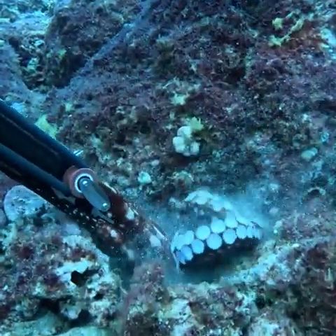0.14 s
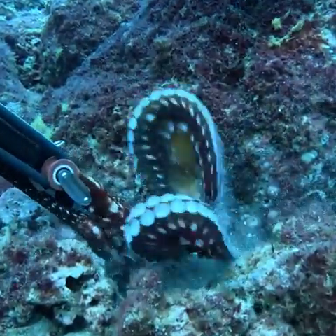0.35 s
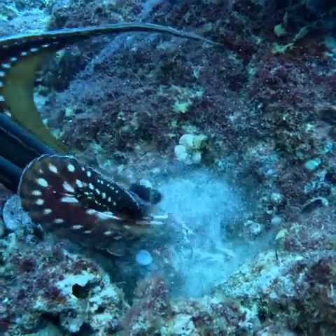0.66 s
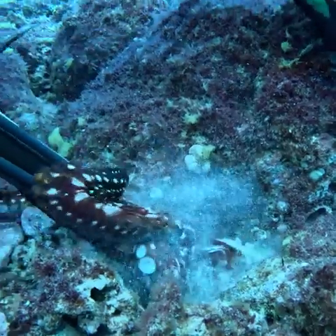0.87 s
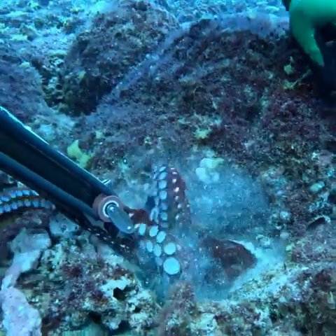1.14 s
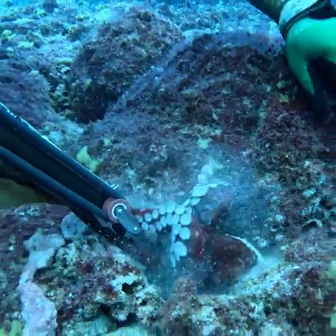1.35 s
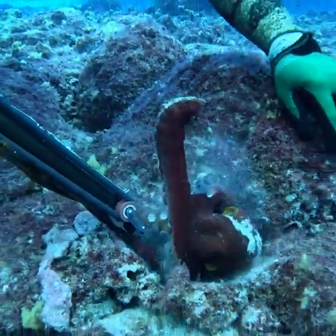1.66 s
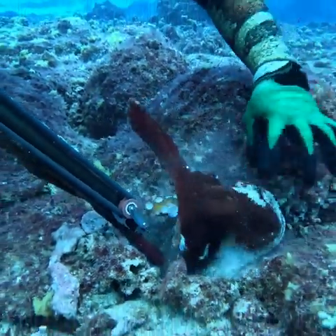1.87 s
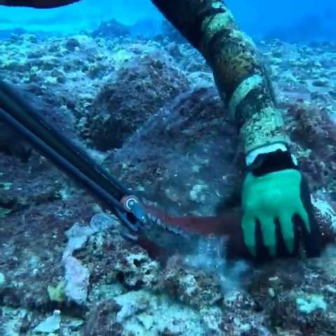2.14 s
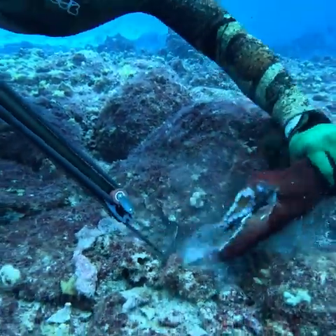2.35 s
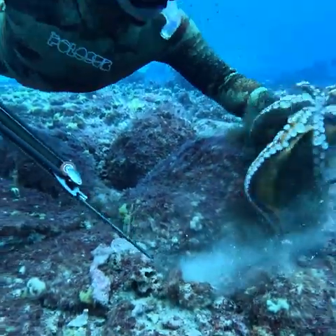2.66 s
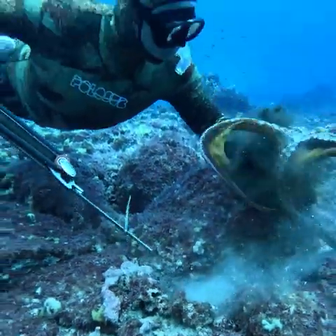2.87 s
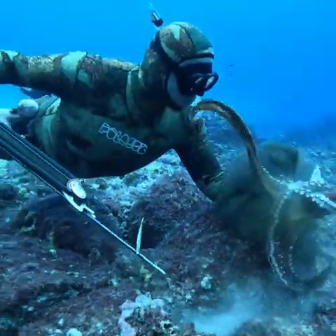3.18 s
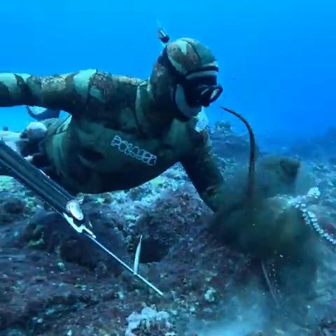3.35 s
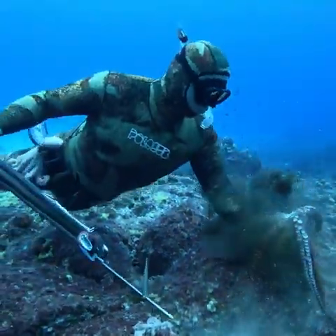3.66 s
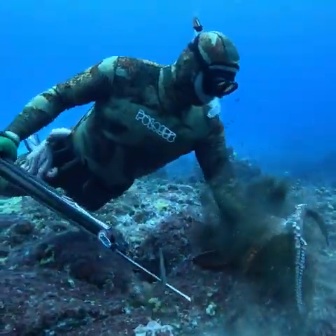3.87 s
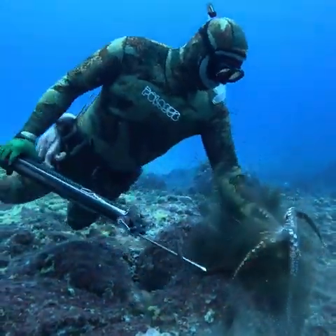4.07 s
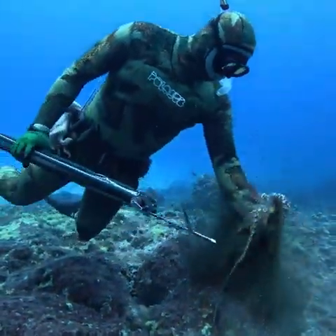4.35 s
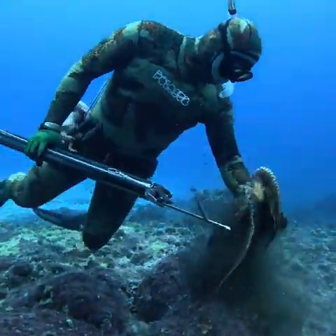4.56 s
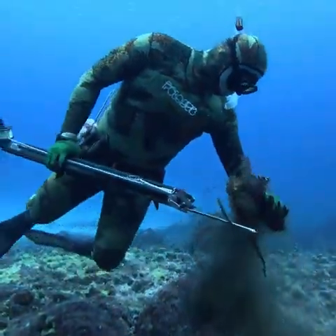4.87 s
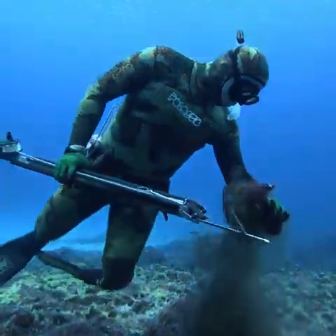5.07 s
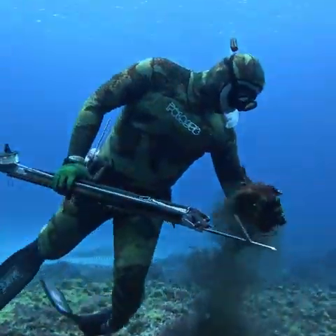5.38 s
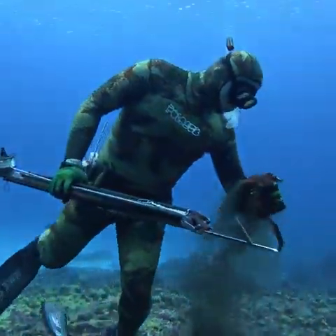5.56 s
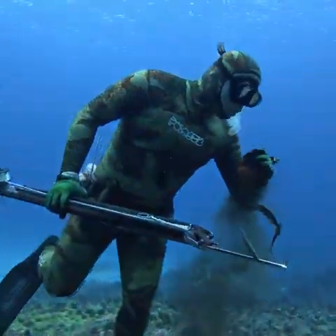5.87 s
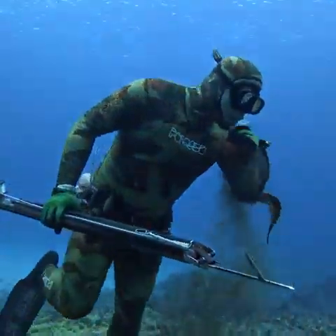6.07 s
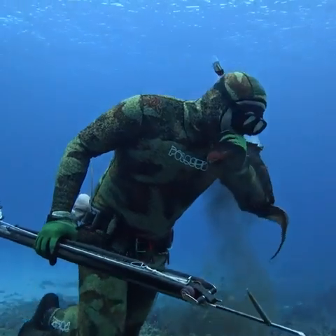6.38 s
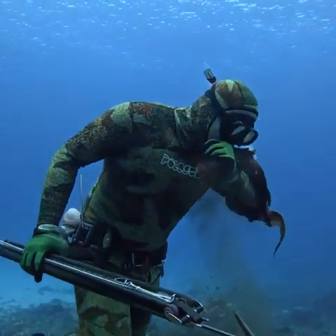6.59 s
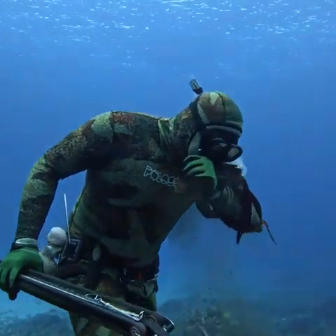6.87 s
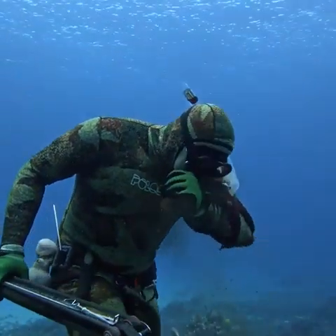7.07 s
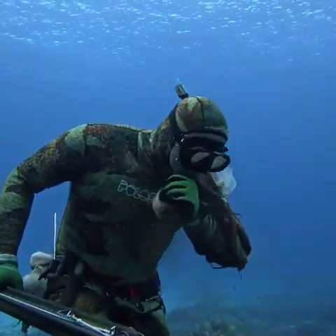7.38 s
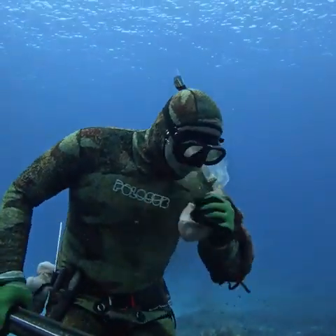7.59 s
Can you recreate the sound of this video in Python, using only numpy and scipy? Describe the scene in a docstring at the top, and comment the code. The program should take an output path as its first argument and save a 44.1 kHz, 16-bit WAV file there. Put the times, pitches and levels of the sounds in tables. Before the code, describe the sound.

Underwater on a reef, heard closely through a small plastic camera housing. A strong dull knock opens at 0 s, with several more clustered at 0.15-0.25 s, gritty scuffs and rubbing over fine crackling shrimp. Around 0.7-0.9 s short pops and scrapes come with a low push of water; one loud, hard knock lands near 1.36 s, followed by lighter rubbing. From 2.5 to 2.7 s a tight clatter of bright knocks and coarse scraping bursts out as the narrow mono image opens to stereo. Then a lull: thin crackle, sparse snaps and small pops, with faint hollow taps near 4.3 s. Crackle rises toward 5 s; sharp snaps and thumping bubble pops bunch at 5.3-6 s, some to the right. Low gurgling rumble swells after 6 s, with softer pops, small knocks and rubs from 6.85 s, and faint hollow taps around 7.5 s.

```python
"""On a reef, a small camera in a plastic housing sits beside a diver, and snapping shrimp crackle all round.
Clicks and noise through the housing resonances make the crackle; pushes on tuned wall modes make the knocks,
rubs and scuffs, and two decaying tones the small ticks and hollow taps. Low filtered noise and clicks make
the rumble and gurgle of the flow, falling chirps the pops at the microphone ports. Mono opens to stereo."""
import sys
import numpy as np
from scipy import signal
from scipy.io import wavfile
from scipy.ndimage import uniform_filter1d

SR = 44100
rng = np.random.default_rng(int(sys.argv[2]) if len(sys.argv) > 2 else 0)


def persist_wave(psi):
    """Save psi, clipped to +-1, as 16-bit WAV."""
    counts = np.round(np.clip(psi, -1, 1) * 32767).astype(np.int16)
    wavfile.write(sys.argv[1], SR, np.atleast_2d(counts).T)


N = 340893
T = np.arange(N) / SR

# crackle bed of the reef: [t/s, level/dB]
REEF_LEVEL = [(0.0, -52.5), (0.34, -55.5), (1.94, -54), (2.58, -58.5), (2.73, -59.5), (3.59, -54.5),
              (4.91, -49.5), (6.59, -48.5), (6.82, -45), (7.49, -47.5), (7.73, -44.5)]
# housing and port resonances for sound in the water, widths before broadening:
# [f/Hz, width/Hz, level in mono/dB, level in stereo/dB]
PORT_MODES = [(405, 370, -12, -12.5), (1576, 625, -3, -3), (2582, 122, -14.5, -2.5), (3028, 316, 2, 2),
              (3977, 640, 1.5, -6.5), (5025, 890, 1.5, -3), (5624, 1700, -1, -4.5), (7517, 534, 1, -1.5),
              (8570, 3000, -74, -18), (10660, 3800, -17.5, -31.5), (12200, 6900, -38, -35)]
MONO_COLUMN, STEREO_COLUMN = 2, 3
# resonances of the difference between the two ports, widths before broadening: [f/Hz, width/Hz, level/dB]
SIDE_MODES = [(1640, 670, -5), (2510, 170, -5), (2980, 530, -1.5), (4000, 350, 0), (5600, 160, -4),
              (9440, 650, -17), (11600, 930, -25)]
# opening of the stereo image: [t/s, share of the side signal (0 to 1)]
STEREO_OPENING = [(0, 0), (2.27, 0), (2.5, 1), (7.73, 0.88)]
# modes of the housing wall, before damping and hardness: [f/Hz, level/dB, t60/s]
WALL_MODES = [(278, -26.5, 0.016), (452, -27, 0.011), (605, -3, 0.028), (692, 3, 0.05),
              (737.4, -3.5, 0.089), (1090, -0.5, 0.028), (1138, 2.5, 0.06), (1267, -11.5, 0.031),
              (1740, -12, 0.0099), (1710, 0, 0.058), (2580, -24, 0.02), (2995, 0, 0.04),
              (5340, -0.5, 0.0068), (7800, -13, 0.0055)]
# knocks on the housing: [t/s, peak level/dB, hardness/(dB per octave)]
KNOCK_HITS = [(0.0, -12, -7.5), (0.151, -17.5, -0.5), (0.162, -17, -19), (0.195, -31, -14),
              (0.206, -13.5, -0.5), (0.214, -25.5, -13), (0.244, -33.5, -1), (0.583, -35, -4),
              (0.684, -30.5, -20), (1.063, -32.5, -2), (1.122, -44, 0), (1.257, -33, -12), (1.275, -38, -4),
              (1.293, -38, -3), (1.363, -10.5, -1), (1.446, -25.5, -16), (1.436, -36, -5), (1.481, -35, -9),
              (1.492, -37, -16), (1.86, -38, -5), (2.013, -35.5, -14), (2.112, -39, -5), (2.132, -37, -11),
              (2.235, -32.5, -18), (2.526, -32, 3), (2.543, -30, 3), (2.570, -18, 1), (2.593, -12, 1),
              (2.575, -24, 3), (2.599, -22, 9), (2.608, -29, 3), (2.629, -20.5, -8), (2.641, -20, 6),
              (2.647, -20, 6), (2.655, -22, -2), (2.664, -11, 1), (2.682, -32, 2.5), (2.697, -22, -5),
              (6.863, -32, -21), (6.887, -35, 5), (6.909, -36, -4), (6.931, -32, 6), (6.942, -32, -1),
              (6.95, -29.5, -0.5), (7.001, -35, -14), (7.025, -41, -10), (7.048, -44, -14),
              (7.066, -42.5, -13), (7.092, -46, -6), (7.103, -41.5, -14), (7.148, -35, -15), (7.2, -36, -4),
              (7.219, -47, -10), (7.473, -38, -9), (7.528, -28, -4), (7.63, -34, 4)]
# rubbing on the housing: [t/s, level/dB]
RUB_LEVEL = [(0.0, -48.5), (0.17, -53), (0.41, -62.5), (0.64, -69), (0.73, -48.5), (1.03, -58), (1.31, -55),
             (1.59, -56), (1.87, -65), (2.43, -58), (2.56, -54), (2.84, -69), (3.44, -64.5), (3.66, -65.5),
             (4.4, -63.5), (5.47, -65.5), (5.77, -55.5), (6.0, -62.5), (6.52, -59), (6.93, -56),
             (7.04, -60), (7.21, -63), (7.73, -57)]
# flow past the ports, before its random swells: [t/s, slow eddy level/dB, gurgle level/dB]
FLOW_LEVELS = [(0.0, -52, -54), (0.54, -51.5, -70), (0.77, -45, -61), (1.12, -57.5, -58.5),
               (1.46, -50, -50), (1.78, -45.5, -66), (2.5, -48.5, -57.5), (2.71, -59, -66.5),
               (3.25, -57.5, -64.5), (3.95, -56.5, -61), (4.25, -55, -59.5), (4.48, -50.5, -53),
               (5.02, -48, -59), (5.36, -43.5, -69), (5.75, -45, -49), (6.2, -38.5, -63.5),
               (6.55, -40.5, -57), (6.76, -46.5, -64), (7.19, -37.5, -50.5), (7.73, -42.5, -46)]
# single shrimp close by, and at some knocks the bright crack of the hit: [t/s, peak level/dB, brightness/(dB
# per octave)]
NEAR_SNAPS = [(0.033, -31, -10), (0.3677, -33.5, -11), (0.464, -38, -21), (0.615, -29.5, -6),
              (0.9, -34.5, -8), (0.941, -28.5, -14), (1.1, -33, 2), (1.2401, -22.5, -4),
              (1.343, -34.5, -12), (1.586, -34, 2), (1.7, -25, -13.5), (1.722, -27.5, -6), (1.836, -45, 2),
              (2.291, -29.5, 11), (2.354, -41, 2), (2.446, -40, 2), (2.5249, -29.5, -14), (2.541, -34, 7),
              (2.551, -28.5, -4), (2.556, -28.5, -10), (2.566, -39, 13), (2.6623, -24, 12),
              (2.711, -46, -8), (3.634, -35, -4.5), (3.697, -28.5, 15), (4.303, -34, -10),
              (4.5405, -33, -9), (4.631, -36, 6), (4.937, -29, -19), (4.9567, -29.5, 3), (5.2192, -36, -5),
              (5.353, -19.5, 5.5), (5.423, -18, 4.5), (5.6616, -27.5, -4), (5.7464, -30.5, -5.5),
              (5.785, -31, -6), (5.85, -30, -10), (6.62, -33.5, 2), (6.698, -28.5, -8), (6.714, -29.5, 8),
              (6.731, -32, 6), (6.7914, -29.5, -5.5), (6.946, -31.5, 2), (7.113, -34, -4), (7.227, -28, 2),
              (7.273, -30, 0), (7.5732, -25.5, 5)]
# gritty scuffs along the housing: [t/s, length/s, grit level/dB]
SCUFF_STROKES = [(0.156, 0.1, -47), (0.057, 0.013, -73), (0.278, 0.11, -61), (0.386, 0.076, -58.5),
                 (0.568, 0.066, -54.5), (0.632, 0.14, -62), (0.737, 0.057, -48.5), (0.818, 0.083, -54),
                 (1.032, 0.073, -60), (1.206, 0.15, -61), (1.367, 0.077, -57.5), (1.418, 0.091, -54.5),
                 (1.68, 0.15, -57.5), (1.808, 0.17, -60), (1.99, 0.065, -69), (2.081, 0.093, -59),
                 (2.192, 0.09, -62.5), (2.52, 0.032, -51), (2.56, 0.064, -40.5), (2.614, 0.071, -40.5),
                 (3.515, 0.31, -60), (3.964, 0.1, -64.5), (4.222, 0.11, -55), (4.582, 0.088, -63.5),
                 (4.824, 0.037, -62.5), (5.437, 0.039, -55), (5.66, 0.1, -61), (6.852, 0.19, -57.5),
                 (7.064, 0.26, -61.5), (7.32, 0.14, -62), (7.429, 0.26, -57)]
# pops at a port: [t/s, peak level/dB, slowness/ms, direction (+1 outward, -1 inward), left minus right/dB]
PORT_POPS = [(0.418, -37, 0.28, -1, -2), (0.733, -21, 0.31, 1, -1), (0.7397, -29.5, 0.21, -1, -2),
             (0.7643, -22, 0.28, -1, 0), (0.865, -25, 0.29, -1, -3), (0.908, -30.5, 0.91, 1, 0),
             (1.1014, -30.5, 0.46, 1, -4), (1.558, -36, 0.23, -1, 0), (1.6422, -32.5, 0.46, 1, 0),
             (1.904, -30.5, 0.39, 1, 6), (2.188, -32.5, 1.5, -1, 3), (2.2357, -30, 3.1, 1, 0),
             (2.38, -27.5, 0.5, -1, -3), (3.2731, -36.5, 0.56, 1, 0.5), (3.79, -31.5, 0.26, -1, -10.5),
             (3.948, -42, 1.1, 1, 3.5), (4.195, -29, 0.72, -1, -10.5), (4.2212, -28.5, 0.5, -1, -11),
             (4.333, -38, 0.15, -1, 0), (4.495, -30, 0.39, -1, -12.5), (5.1455, -30.5, 0.34, 1, 2),
             (5.1793, -29.5, 0.99, -1, -9.5), (5.288, -38.5, 0.44, -1, 0), (5.432, -35.5, 0.84, -1, 7),
             (5.4657, -18, 0.45, -1, -12), (5.585, -25, 0.83, -1, 0.5), (5.637, -17.5, 0.41, -1, -11.5),
             (5.676, -31, .8, -1, -2), (5.702, -25, 0.54, -1, 0), (5.741, -43, 0.81, -1, 2),
             (5.7692, -23, 0.76, -1, 0), (5.827, -24.5, 0.47, -1, -0.5), (5.883, -34, 1.5, -1, 3.5),
             (5.9, -39, 0.55, 1, 0), (5.927, -27.5, 0.9, -1, 3.5), (5.965, -28, 3.9, 1, 1),
             (6.027, -28, 2.2, 1, 1), (6.043, -31, 0.56, -1, -2), (6.124, -46, 0.79, -1, -3),
             (6.152, -38, 1.2, -1, -2), (6.181, -38, 3.1, 1, 5), (6.235, -35, 0.47, 1, -2),
             (6.26, -32.5, 2.1, 1, 1), (6.286, -33.5, 0.57, -1, 1.5), (6.331, -36.5, 0.82, 1, 2),
             (6.357, -51, 1, 1, 0), (6.409, -43, 0.92, 1, 0), (6.45, -32.5, 0.56, -1, -0.5),
             (6.474, -40, 1.2, 1, 3), (6.52, -40, 1.43, -1, 2), (6.546, -40, 0.7, 1, 2),
             (6.957, -35.5, 1.3, -1, 0), (7.013, -32, 1.6, -1, 1), (7.195, -30.5, 0.88, 1, 5),
             (7.254, -27.5, 0.58, -1, 2.5), (7.416, -26, 0.43, 1, 1.5)]
# dry ticks of a small part on the housing: [t/s, peak level/dB, f/Hz]
PART_TICKS = [(2.19, -44, 1500), (2.284, -43, 1330), (5.1456, -32, 1420)]
# hollow taps on an air pocket in the housing: [t/s, peak level/dB]
POCKET_TAPS = [(4.243, -40.5), (4.292, -48), (4.32, -42), (7.474, -39), (7.53, -32.5), (7.554, -32),
               (7.576, -37.5), (7.634, -41)]

SNAP_BASS_DB = -9  # snaps hardly stir the resonances below 2 kHz
SNAP_COLOUR_DB = 4  # each resonance flickers by about this much in the snaps of the bed
SNAP_LEFT_DB, SNAP_SCATTER_DB = 3.5, 1.5  # near snaps lean a little to the left
HELD_T60_S = 0.017  # the holding hand damps the modes above 900 Hz
HARD_FROM_DB, HARD_DAMP_DB = 1, 20.5  # above the first, each step of the second halves the ring
KNOCK_PUSH_MS, KNOCK_ROUGH = 1.8, 3.5  # time to the crest of the push; noise mixed into it
KNOCK_APART_DB = -9  # the wall sounds a little different at each port
THUD_HZ, THUD_WIDTH_HZ, THUD_DB = 200, 270, -19  # the whole camera jolts under a knock
CRACK_DB, CRACK_PER_HARDNESS, CRACK_TILT_DB = -15.5, 0.83, -19.5  # tick of contact, louder when hard
GRIP_S = 0.12  # how long the fingers keep one grip
GRIT_HZ, GRIT_AT_DB, GRIT_DB_PER_OCTAVE = 1325, -50, 20  # louder scuffs reach higher
SOFT_TOP_HZ = 350  # top of a soft pop of 1 ms slowness; slower ones are duller
WOBBLE_HZ, WOBBLE_WIDTH_HZ, WOBBLE_DB = 176.4, 68, 2.5  # middle pitch of a bubble between the ports
TICK_MS = 0.5
POCKET_HZ, POCKET_T60_S = 433, 0.095
LEFT_RIGHT = np.array([[1], [-1]])  # puts a side signal in opposite polarity left and right


def undb(db):
    """Decibels to linear gain."""
    return 10 ** (np.asarray(db, float) / 20)


def unit(x):
    """Scale to an RMS of 1."""
    return x / np.sqrt(np.mean(x ** 2))


def curve(table):
    """Columns of a table drawn as automation, one value a sample."""
    s, *columns = np.transpose(table)
    return [np.interp(T, s, c) for c in columns]


def band(x, hz, width):
    """Two-pole resonance, gain 1 at the centre."""
    return signal.lfilter(*signal.iirpeak(hz, hz / width, fs=SR), x)


def lowpass(x, order, hz):
    """Roll off the top with a Butterworth filter."""
    return signal.sosfilt(signal.butter(order, hz, fs=SR, output="sos"), x)


def walk(rate):
    """Random levels, a new one every 1 / rate s, smoothed into slopes; spread near 1."""
    k = int(SR / rate)
    steps = np.repeat(rng.standard_normal(N // k + 1), k)
    return 1.56 * uniform_filter1d(steps, k)[:N]


def grains(rate, spread_db):
    """Random clicks, rate of them a second, with a long tail of loud ones."""
    chance, loudness = rng.random((N, 2)).T
    size = undb(-spread_db * np.log(1 - .975 * loudness))
    return unit((chance < rate / SR) * size * rng.standard_normal(N))


def add(out, s, x, db, pan_db=0):
    """Place a sound at its time, peak level and side."""
    i = int(s * SR)
    x = x[..., :N - i]
    x = x * undb(db) / np.max(np.abs(x))
    out[:, i:i + x.shape[-1]] += x * undb([[pan_db / 2], [-pan_db / 2]])


def ports(x, modes, column, tilt_db=0, flicker_db=0, bass_db=0):
    """Water sound through the housing: steep parallel resonances, each able to flicker on its own."""
    out = 0
    for row in modes:
        hz, width = row[0], 1.11 * row[1]
        db = row[column] + tilt_db * np.log2(max(hz, 3000) / 5000)
        if flicker_db:
            db = db + flicker_db * walk(45)
        if hz < 2000:
            db = db + bass_db
        out = out + undb(db) * band(band(x, hz, width), hz, width)
    return out


def spike(noise, s, tilt_db):
    """A thin ragged burst of a millisecond or two, heard through the ports."""
    t = np.arange(len(noise)) / SR
    burst = noise * t ** 2 * np.exp(-t / 0.00063)
    column = MONO_COLUMN if s < STEREO_OPENING[1][0] else STEREO_COLUMN
    return ports(burst, PORT_MODES, column, tilt_db=tilt_db, bass_db=SNAP_BASS_DB)


def wall(push, hard_db, damp=0.81, blow=False):
    """Wall modes rung by a push; hardness lifts the upper modes, and grip and place shift them a little."""
    out = 0
    hard_damp = 2 ** (max(hard_db - HARD_FROM_DB, 0) / HARD_DAMP_DB)
    scatter = rng.standard_normal((len(WALL_MODES), 2))
    for (hz, db, t60), (place, grip) in zip(WALL_MODES, scatter):
        db = db + hard_db * np.log2(hz / 700)
        polarity = 1
        if hz > 900:  # upper modes feel the hand and the place of contact
            t60 = min(t60, HELD_T60_S)
            db = db + 1.6 * place
            polarity = np.sign(place)
        width = np.log(1000) / (np.pi * t60) * hard_damp * damp
        gain = polarity * undb(db)
        hz = hz * (1 + 0.028 * grip)
        if blow:  # even out how strongly this push feeds each mode
            wave = np.exp(2j * np.pi * hz * np.arange(len(push)) / SR)
            fed = np.abs(push @ wave) / np.linalg.norm(push)
            gain = gain / max(fed, .5)
        out = out + gain * band(push, hz, width) / width
    return out


def reef():
    """Countless far snaps melt into hiss, nearer ones crackle in bunches; each comes from its own side."""
    crackle = grains(700, spread_db=3.3) * undb(1.8 * walk(25))
    hiss = undb(3.5) * rng.standard_normal(N)
    side_source = crackle * rng.standard_normal(N) + rng.standard_normal(N)
    side = ports(side_source, SIDE_MODES, column=2, flicker_db=3.0)
    stereo = curve(STEREO_OPENING)[0]
    mid = 0
    for column, share in ((MONO_COLUMN, 1 - stereo), (STEREO_COLUMN, stereo)):
        far = ports(hiss, PORT_MODES, column, flicker_db=0.75)
        near = ports(crackle, PORT_MODES, column, flicker_db=SNAP_COLOUR_DB, bass_db=SNAP_BASS_DB)
        mid = mid + share * (far + near)
    return undb(curve(REEF_LEVEL)[0]) * (mid + side * LEFT_RIGHT) / np.std(mid)


def knocks():
    """Each knock is a tick of contact, a thud and a short rough push on the wall."""
    out, t = np.zeros((2, N)), np.arange(4000) / SR
    for s, db, hard_db in KNOCK_HITS:
        noise = rng.standard_normal(len(t))
        push = (1 + KNOCK_ROUGH * noise) * t * np.exp(-1000 * t / KNOCK_PUSH_MS)
        top_hz = max(4400.0 * 2 ** (min(hard_db, 0) / 8.6), 900.)  # soft contact is dull
        ring = wall(push, hard_db, blow=True)
        apart = undb(KNOCK_APART_DB) * wall(push, hard_db + 1.5, blow=True) * LEFT_RIGHT
        add(out, s, lowpass(ring + apart, 2, top_hz), db)
        thud = band(lowpass(push, 2, top_hz), THUD_HZ, THUD_WIDTH_HZ)
        add(out, s, thud, db + THUD_DB - 1.5 * max(hard_db, 0))
        crack = spike(noise[-600:], s, CRACK_TILT_DB)
        add(out, s, crack, db + CRACK_DB + CRACK_PER_HARDNESS * hard_db)
    return out


def rub():
    """Light stick-slip of fingers keeps the wall humming; every new grip shifts the modes."""
    slips = grains(700, spread_db=2.0) * undb(4.0 * walk(20))
    slips = lowpass([slips, slips * rng.standard_normal(N)], 2, 1800.)  # mid and side
    n, out = int(GRIP_S * SR), np.zeros((2, N + SR))
    for i in range(0, N, n):
        with_tail = np.pad(slips[:, i:i + n], ((0, 0), (0, 2500)))  # room to ring on
        rung = wall(with_tail, 1.1, damp=1.1)
        out[:, i:i + rung.shape[1]] += rung
    mid, side = unit(out[0, :N]), unit(out[1, :N])
    return undb(curve(RUB_LEVEL)[0]) * (mid + undb(-5.5) * side * LEFT_RIGHT)


def flow():
    """Slow eddies press on both ports alike; small ones gurgle in soft lumps."""
    eddy_db, gurgle_db = curve(FLOW_LEVELS)
    eddies = band(band(band(rng.standard_normal(N), 29.7, 25.0), 38.0, 110.0), 35.5, 60.0)
    eddies = unit(eddies) * undb(1.94 * walk(9.9))
    lumps = band(band(band(grains(260, spread_db=2.0), 52.0, 156.0), 72.0, 260.0), 67.0, 190.0)
    lumps = unit(lumps) * undb(4.0 * walk(10))
    side = unit(band(band(rng.standard_normal(N), 52.0, 100.), 70., 203.0))
    both = undb(eddy_db) * eddies + undb(gurgle_db) * lumps
    return both + undb(eddy_db - 27.5) * side * LEFT_RIGHT


def snaps():
    """Single shrimp close by, and the bright cracks of some knocks, each a ragged spike through the housing
    resonances."""
    out = np.zeros((2, N))
    for s, db, tilt_db in NEAR_SNAPS:
        pan_db = SNAP_LEFT_DB + SNAP_SCATTER_DB * rng.standard_normal()
        add(out, s, spike(rng.standard_normal(600), s, tilt_db), db, pan_db)
    return out


def scuffs():
    """Dense uneven grit with a quick fade at each end; part of it rings the wall."""
    out = np.zeros((2, N))
    slips = grains(2000, spread_db=3.0) * undb(3.0 * walk(50))
    slips = np.array([slips, slips * rng.standard_normal(N)])  # mid and side
    for s, length, db in SCUFF_STROKES:
        top_hz = GRIT_HZ * 2 ** ((db - GRIT_AT_DB) / GRIT_DB_PER_OCTAVE)
        i, n = int(s * SR), int(length * SR)
        grit = slips[:, i:i + n] * signal.windows.tukey(n, .3)
        grit = np.pad(grit, ((0, 0), (0, 2000)))[:, :N - i]  # room to ring on
        grit = signal.sosfilt(signal.butter(3, [180., top_hz], "band", fs=SR, output="sos"), grit)
        mid, side = unit(grit) + undb(-5.0) * unit(wall(grit, 2.1))
        out[:, i:i + len(mid)] += undb(db) * (mid + undb(-12.5) * side * LEFT_RIGHT)
    return out


def pops():
    """A trapped bubble slips at a port: a tick whose pitch falls fast into a thump."""
    out, t = np.zeros((2, N)), np.arange(4000) / SR
    for s, db, ms, way, pan_db in PORT_POPS:
        at_one_port = abs(pan_db) > 4
        u = 1000 * t / ms  # time stretched by the slowness
        swing = np.cos(np.pi * np.log1p(u)) / (1 + u / 9) ** 1.5
        # the water pushes one way, then eases back
        lean = 2.2 * u / 6 * np.exp(-u / 5) - .15 * np.exp(-u / 40)
        # only a slip right at one port keeps its tick
        top_hz = 3500. if at_one_port else min(SOFT_TOP_HZ / ms ** .5, 900.)
        pop = lowpass((swing + lean) * (1 - np.exp(-u / 0.34)), 3, top_hz)
        if not at_one_port:  # a bubble between the ports wobbles on
            wobble_hz = WOBBLE_HZ * 2 ** (0.43 * rng.standard_normal())
            pop = pop + undb(WOBBLE_DB) * band(pop, wobble_hz, WOBBLE_WIDTH_HZ)
        add(out, s, way * pop, db, pan_db)
    return out


def ticks():
    """A small part ticks on the housing: a sine that swells and dies within milliseconds."""
    out, t = np.zeros((2, N)), np.arange(4000) / SR
    for s, db, hz in PART_TICKS:
        add(out, s, np.sin(2 * np.pi * hz * t) * t * np.exp(-1000 * t / TICK_MS), db)
    return out


def taps():
    """An air pocket in the housing answers a tap with one hollow, soft-edged decaying tone."""
    out, t = np.zeros((2, N)), np.arange(4000) / SR
    ring = np.sin(2 * np.pi * POCKET_HZ * t) * np.exp(-np.log(1000) * t / POCKET_T60_S)
    for s, db in POCKET_TAPS:
        add(out, s, ring * (1 - np.exp(-t / 0.0013)), db)
    return out


def scene():
    """Mix all layers at the two ports."""
    return reef() + knocks() + rub() + flow() + snaps() + scuffs() + pops() + ticks() + taps()


def record(dry):
    """The recorder sums its ports at first, then opens to stereo; it cuts the lowest bass and the top."""
    mid = (dry[0] + dry[1]) / 2
    side = (dry[0] - dry[1]) / 2 * curve(STEREO_OPENING)[0]
    out = signal.sosfilt(signal.butter(2, 22., "high", fs=SR, output="sos"), mid + side * LEFT_RIGHT)
    out = lowpass(out, 4, 13500.)
    return signal.sosfilt(signal.ellip(10, .2, 80, 15700, fs=SR, output="sos"), out)  # steep top edge


dry = scene()
out = record(dry)
persist_wave(out)
```